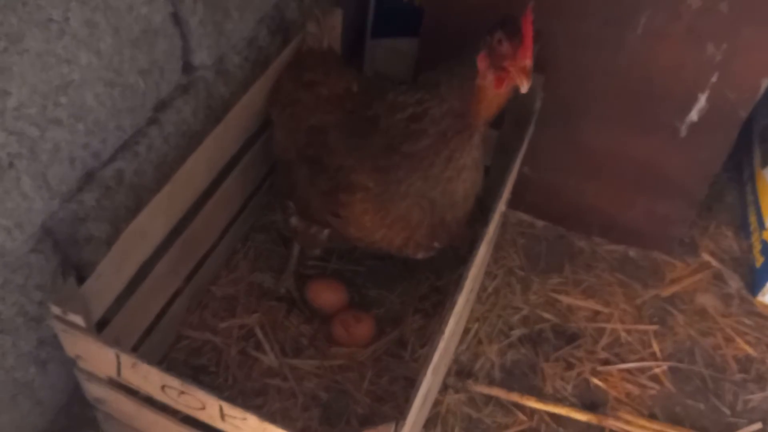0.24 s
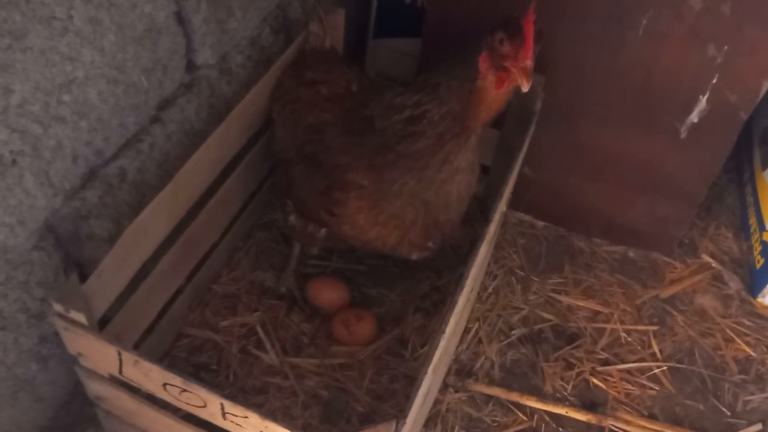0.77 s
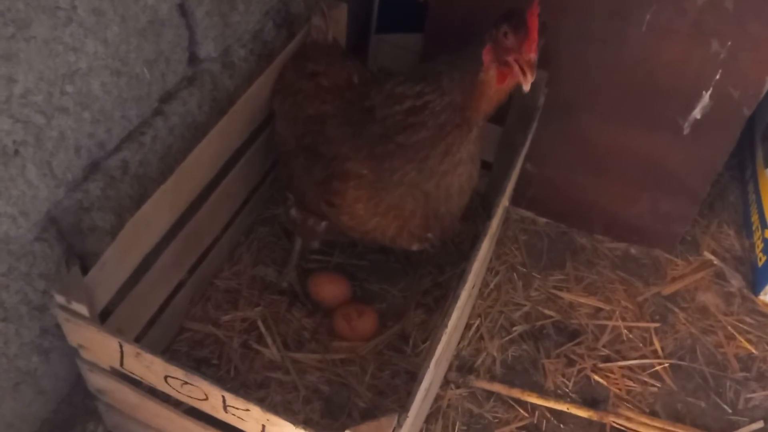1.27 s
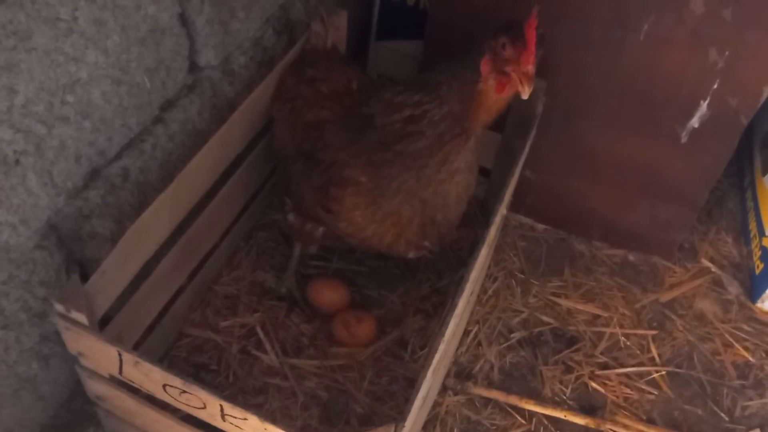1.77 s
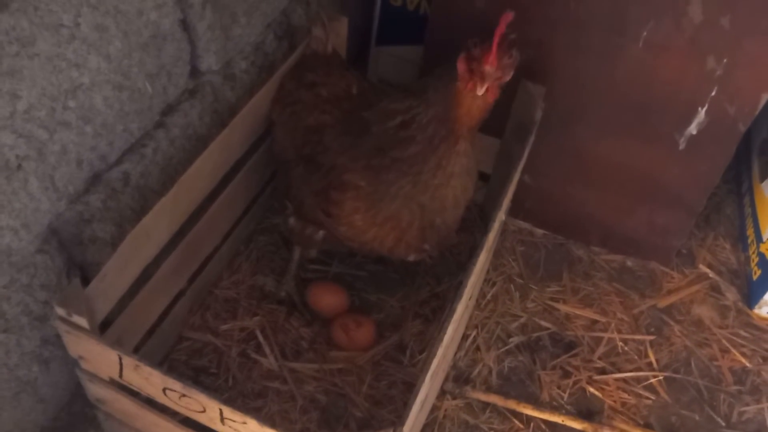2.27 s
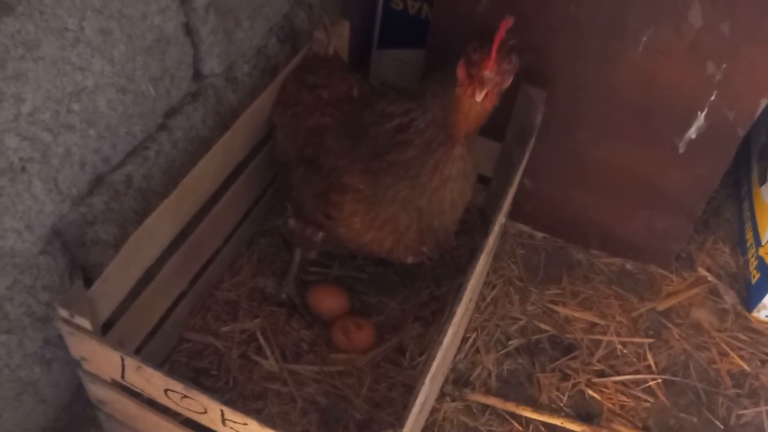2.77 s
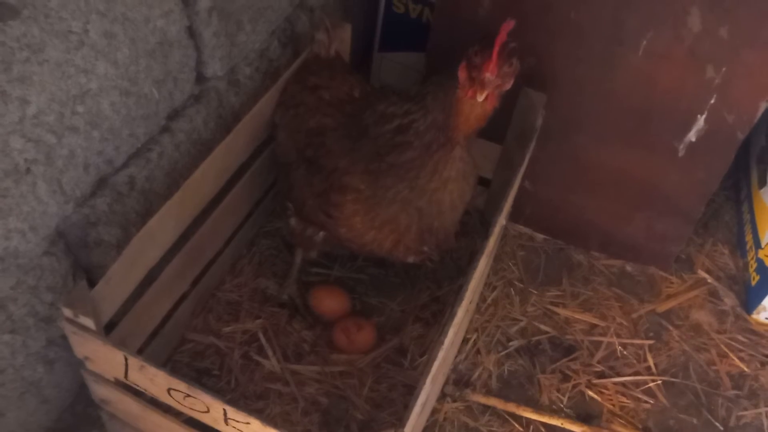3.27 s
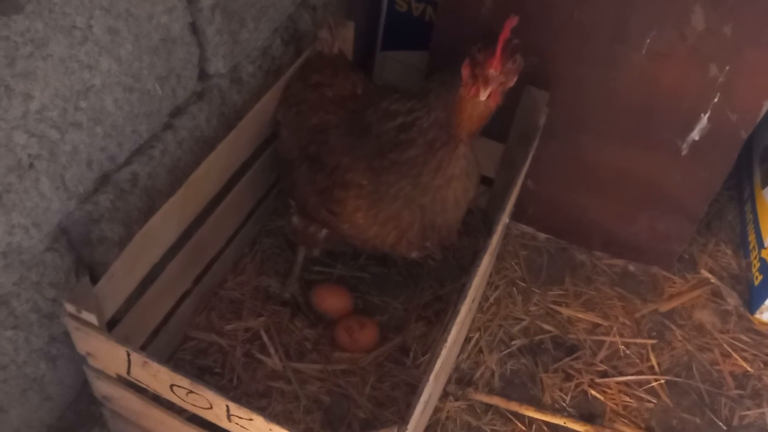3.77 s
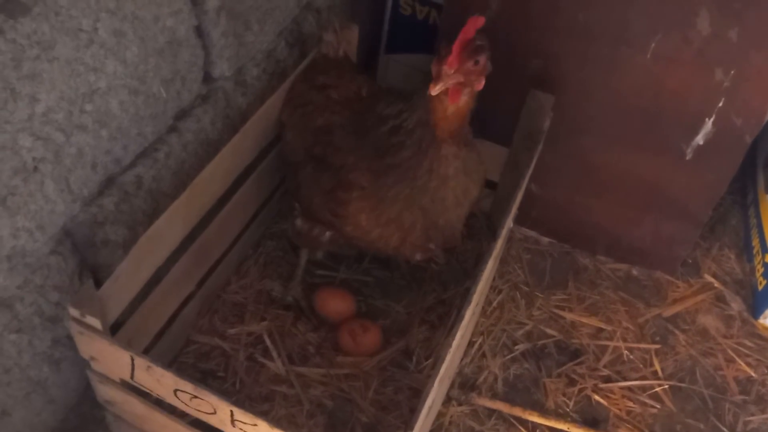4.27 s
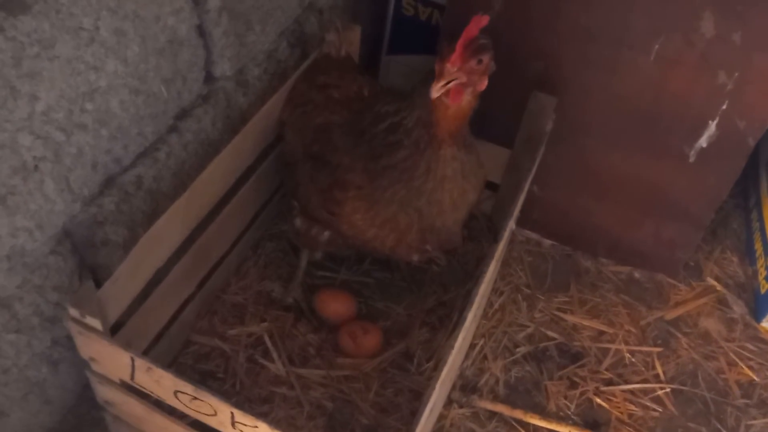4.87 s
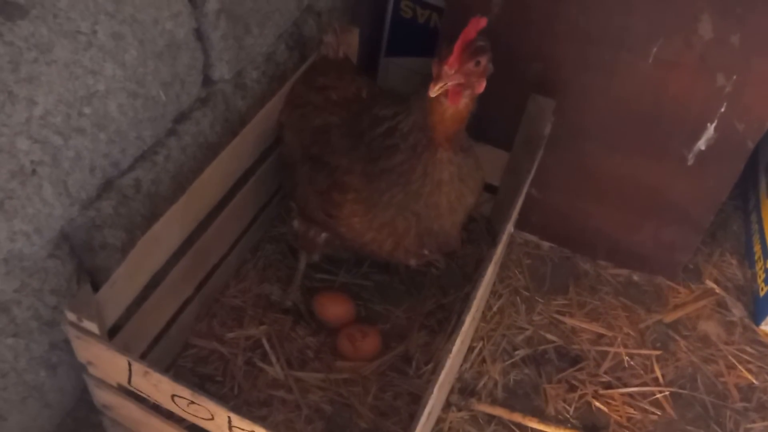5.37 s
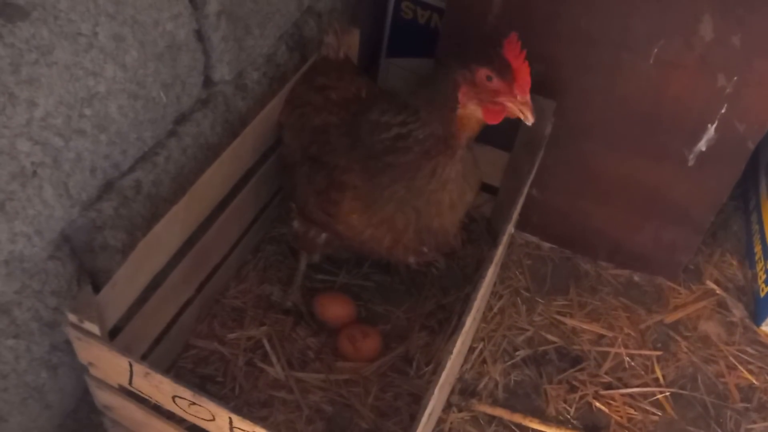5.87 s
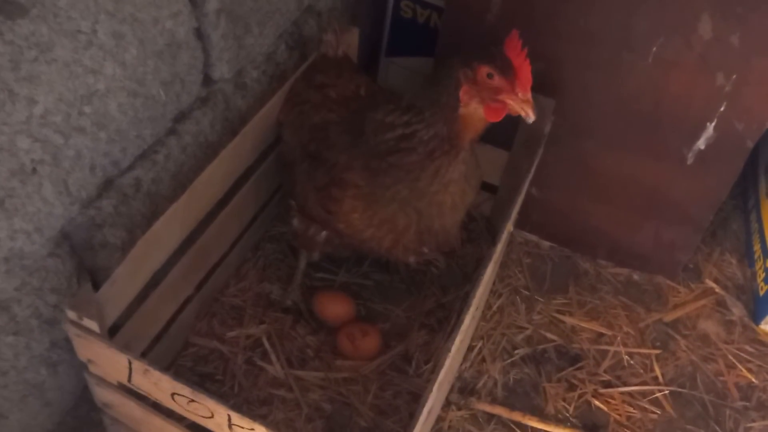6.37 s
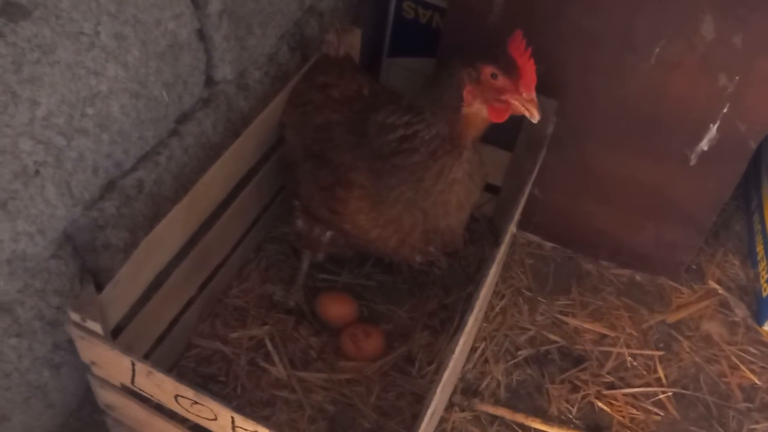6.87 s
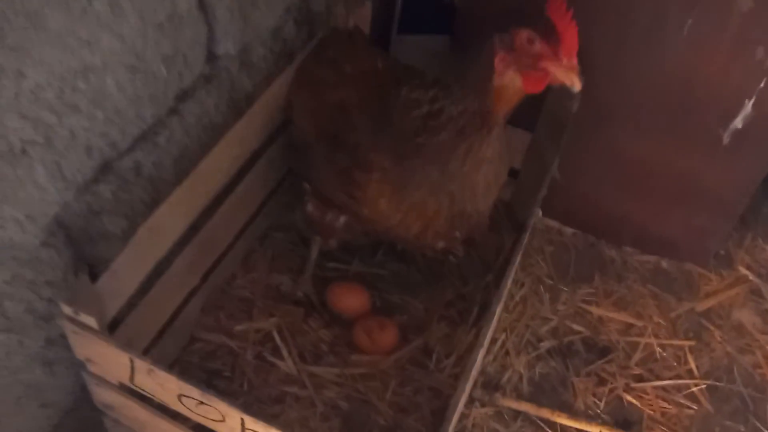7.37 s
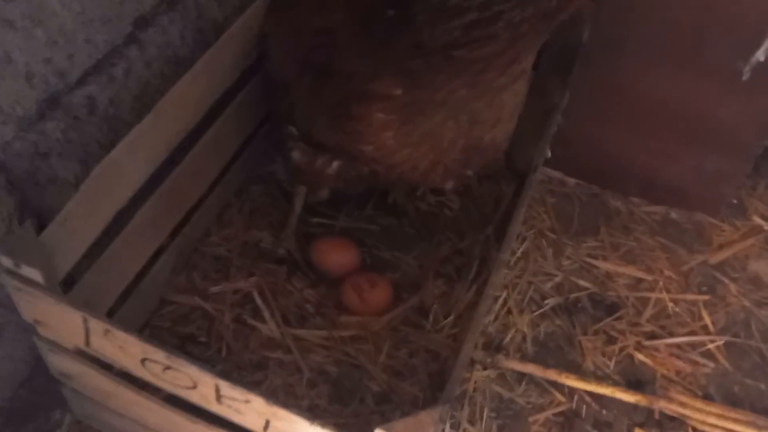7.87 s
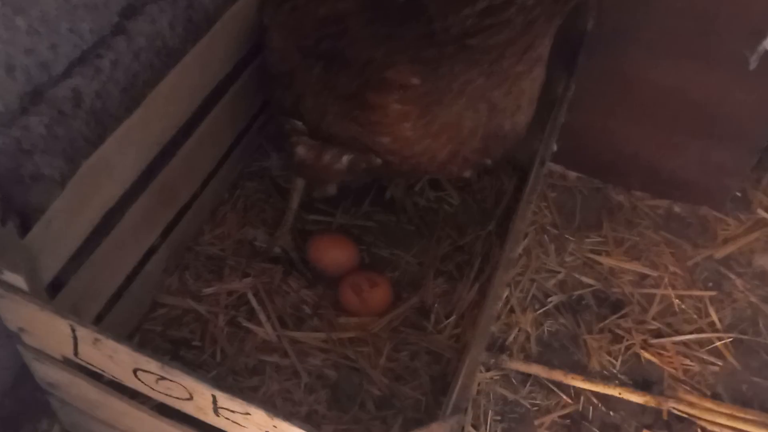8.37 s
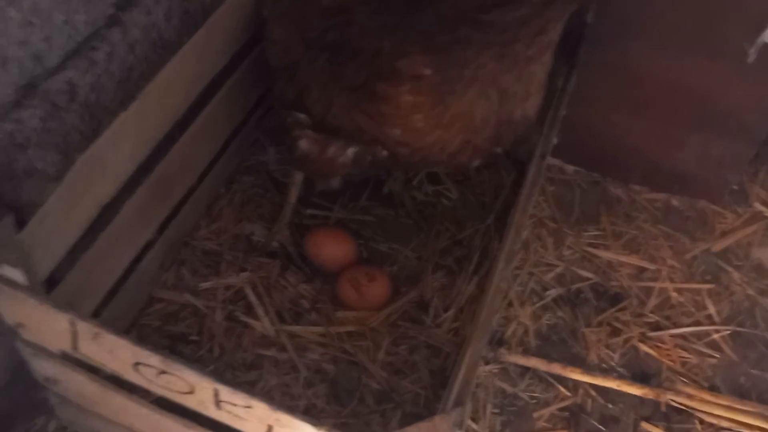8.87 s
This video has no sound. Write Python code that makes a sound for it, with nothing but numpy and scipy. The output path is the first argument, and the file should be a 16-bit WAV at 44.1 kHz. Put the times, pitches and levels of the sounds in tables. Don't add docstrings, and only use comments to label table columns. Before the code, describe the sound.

One hen cackles without pause close to a stereo microphone in a small shed. Hoarse, throaty clucks of about a tenth of a second come roughly three per second; every second or third stretches into a louder squawk that briefly locks into a clear rising tone, then breaks up. Short woody reflections from the nest box and a faint low hush surround her.

```python
import sys
import numpy as np
from scipy import signal
from scipy.fft import rfft, irfft, next_fast_len
from scipy.io import wavfile
from scipy.ndimage import uniform_filter1d, map_coordinates

SR = 44100
rng = np.random.default_rng(int(sys.argv[2]) if len(sys.argv) > 2 else 0)


def digitize_waveform(pressure):
    field = np.atleast_2d(pressure).T
    bounded = np.clip(field, -1, 1)
    quanta = np.round(bounded * 32767).astype(np.int16)
    wavfile.write(sys.argv[1], SR, quanta)


def convert_level_to_amplitude(level_db):
    exponent = np.asarray(level_db, float) / 20
    return 10 ** exponent


N = 402633

# start t/s, length t/s, peak level/dB, windpipe f/Hz (twice the slap rate)
CLUCK_EVENTS = [(0.064, 0.11, -20, 1085), (0.319, 0.093, -20.5, 1070), (0.657, .1, -18.5, 1100),
                (0.918, 0.1, -19.5, 1120), (1.161, 0.098, -19.5, 1050), (1.568, 0.098, -20, 1100),
                (1.812, .11, -21, 1060), (2.177, 0.088, -21.5, 1045), (2.426, .1, -20.5, 1060),
                (2.87, 0.087, -21.5, 1070), (3.123, .12, -22, 1045), (3.404, 0.071, -23, 1025),
                (3.77, 0.12, -19, 1060), (4.072, 0.087, -20, 1025), (4.465, 0.095, -21.5, 1045),
                (4.737, .1, -22, 1020), (5.125, .082, -21.5, 1035), (5.447, 0.097, -23, 1010),
                (5.693, .08, -23.5, 1020), (6.049, .09, -20, 1035), (6.473, 0.086, -23, 1055),
                (6.709, 0.11, -22.5, 1045), (7.053, .1, -20.5, 1050), (7.314, 0.074, -24.5, 1060),
                (7.665, 0.096, -23.5, 845), (7.902, .08, -23, 935), (8.246, 0.083, -23, 1000),
                (8.719, .09, -26.5, 925), (8.958, 0.088, -25.5, 950)]
POSTURE_TURNS = [
    2.39,
    7.55,
]
BEAK_HZ, RASP_HZ, TOP_HZ = 1400, 2950, 15900


def hen():
    # f/Hz, width f/Hz, level/dB
    resonances = [
        [(272, 150, -22), (477, 110, -20.5), (807, 140, -3.5), (1460, 130, -27.5), (1970, 270, -19.5),
         (2150, 820, -7.5), (3735.6, 180, -24.5), (4250, 240, -28.5), (5230, 990, -41), (8000, 2100, -35),
         (13470, 1800, -44.5)],
        [(254, 170, -23), (473, 97, -19), (790, 220, -9.5), (1700, 1200, -23.5), (2340.7, 450, -18),
         (3395, 260, -20.5), (4247, 270, -25.5), (5055, 860, -39.5), (5620, 200, -38.5), (8390, 2100, -36),
         (13100, 3200, -48)],
        [(253, 110, -21.5), (520, 350, -20), (1100, 1000, -6), (1513.5, 55, -15), (2070, 530, -4.5),
         (3670, 200, -22), (4040, 270, -27), (5600, 2000, -30.5), (8447, 2000, -44), (13000, 2400, -49)],
    ]
    (gains, slap_hz), where = drive(), posture()
    breath = np.array([[.2], [.3], [.55]])
    source = slaps(slap_hz, wander=.11, scatter_db=1.8, breath=breath)
    main = windpipe(source[0], slap_hz, width_hz=293)

    def above(f, edge):
        return 1 / (1 + (edge / (f + 1)) ** 12)

    def zones(f):
        beak, rasp = above(f, BEAK_HZ), above(f, RASP_HZ)
        return np.array([1 - beak, beak - rasp, rasp])

    voice, held = tone(gains[2])
    gains = gains * convert_level_to_amplitude(held * np.array([[-26], [-22], [-12.5]]))
    for p, modes in enumerate(resonances):
        at = np.flatnonzero(where == p)
        parts = filtered(source[:, at], lambda f: throat(modes)(f) * zones(f))
        parts[0] += main[at]
        voice[at] += sum(g * unit(part) for g, part in zip(gains[:, at], parts))
    return voice


def drive():
    # start t/s, peak t/s, release t/s, start level/dB, peak level/dB
    squawks = [(0.374, 0.473, .072, -25, -14.5), (1.241, 1.329, 0.066, -24.5, -17),
               (1.870, 1.966, .07, -25, -18.5), (2.488, 2.605, 0.063, -23, -15.5),
               (3.460, 3.58, 0.073, -23, -14.5), (4.138, 4.220, 0.081, -21.5, -17.5),
               (4.814, 4.922, 0.068, -24, -15.5), (5.763, 5.869, 0.072, -23.5, -16),
               (6.100, 6.175, .055, -25.5, -21), (6.785, 6.860, .06, -26, -19),
               (7.966, 8.066, 0.087, -23.5, -15), (8.300, 8.380, 0.068, -25, -19.5),
               (9.031, 9.140, .06, -27, -17)]
    # share of its length, effort level/dB, beak opening level/dB, rasp level/dB
    cluck_course = [
        (0, -10.5, -19, -29),
        (.17, -4.5, -16.5, -24),
        (.5, 0, -15, -20.5),
        (.7, -2.5, -19, -21),
        (1, -21, -17.5, -20.5),
    ]
    # share of the release, effort level/dB, beak opening level/dB, rasp level/dB
    release_course = [
        (0, -0.5, -6, -14),
        (.22, -3.5, -8, -15),
        (.6, -6.5, -15.5, -18.5),
        (0.999, -23.5, -18.5, -21),
    ]
    # beak level/dB, rasp level/dB
    posture_opening = [
        (-1, 0.6),
        (-0.33, -0.08),
        (1.5, -1.5),
    ]
    stretch_hz = [
        39.97,
        60.26,
        131.2,
    ]
    power, t, where = np.zeros((3, N)), np.arange(N) / SR, posture()

    share, effort_db, beak_db, rasp_db = np.transpose(cluck_course)
    pushes = [push(start + share * length, peak_db + effort_db, beak_db, rasp_db, fade_s=.015)
              for start, length, peak_db, _ in CLUCK_EVENTS]
    share, effort_db, beak_db, rasp_db = np.transpose(release_course)
    beak_db, rasp_db = np.r_[-14.5, beak_db], np.r_[-18.5, rasp_db]
    for start, peak, release, start_db, peak_db in squawks:
        times = np.r_[start, peak + share * release]
        pushes.append(push(times, np.r_[start_db, peak_db + effort_db], beak_db, rasp_db, fade_s=.025))
    for at, gains in pushes:
        power[:, round(at[0] * SR):][:, :len(at)] += gains ** 2
    power[1:] *= convert_level_to_amplitude(2 * np.array(posture_opening)[where].T)

    starts, windpipe_hz = np.transpose(CLUCK_EVENTS)[[0, 3]]
    call = np.clip(np.searchsorted(starts - .03, t) - 1, 0, None)
    stretch = sum(np.interp(t, [start, peak, peak + .1, peak + .12], [0, 1, 1, 0])
                  for start, peak, *_ in squawks)
    slap_hz = (windpipe_hz[call] + stretch * np.array(stretch_hz)[where]) / 2
    return np.sqrt(power), slap_hz


def push(s, effort_db, beak_db, rasp_db, fade_s):
    t = np.arange(round((s[0] - fade_s) * SR), min(round((s[-1] + .02) * SR), N)) / SR
    edge = np.clip(np.minimum((t - s[0]) / fade_s + 0.87, (s[-1] + 0.019 - t) / .02), 0, 1)
    zones = ((0, 1.1), (beak_db, 3), (rasp_db, 2.6))  # level/dB, lateness exponent
    return t, np.array([edge ** late * convert_level_to_amplitude(np.interp(t, s, effort_db + db)) for db, late in zones])


def slaps(hz, wander, scatter_db, breath):
    cycles = np.cumsum(hz * (1 + wander * wobble(260)) / SR)
    at = np.flatnonzero(np.diff(np.floor(cycles)))
    pulses = unit(np.bincount(at, convert_level_to_amplitude(scatter_db * rng.standard_normal(N)[at]), N))
    puff_envelope = signal.lfilter([1], [1, -np.exp(-1 / (.002 * SR))], pulses)
    puffs = puff_envelope * rng.standard_normal(N)
    throb = convert_level_to_amplitude(1.5 * wobble(150) + 1.3 * wobble(70))
    return throb * (np.sqrt(1 - breath) * pulses + np.sqrt(breath) * unit(puffs))


def windpipe(x, hz, width_hz):
    pipe_hz = np.arange(800, 1201, 100)[:, None]
    near = np.clip(1 - abs(np.clip(2 * hz, 800, 1200) - pipe_hz) / 100, 0, 1)
    rings = filtered(x, throat([(pipe_hz, width_hz, 0)], passes=3))
    return (near * rings).sum(0)


def throat(modes, passes=2):
    def mode(f, centre, width):
        loss = (f * width) ** 2
        return (loss / ((centre * centre - f * f) ** 2 + loss)) ** (passes / 2)

    return lambda f: sum(convert_level_to_amplitude(db) * mode(f, centre, width) for centre, width, db in modes)


def tone(rasp):
    # start t/s, end t/s, settled pitch f/Hz, level/dB, closing upturn f/Hz
    locked = [(0.378, 0.466, 528, -20, 12), (1.238, 1.321, 530.3, -24.5, 3.2),
              (1.878, 1.955, 534.3, -22, 1.99), (2.500, 2.599, 530, -23, 3.06),
              (3.472, 3.577, 542, -20.5, 22), (4.146, 4.212, 517.4, -19.5, 2.06),
              (4.840, 4.922, 534.3, -20, 45), (5.790, 5.862, 536.8, -18, 32),
              (6.108, 6.164, 512.4, -21.5, 2.3), (7.970, 8.046, 533, -23.5, 24.7),
              (8.306, 8.361, 520, -24.5, 2.13), (9.055, 9.126, 535.4, -26.5, 34)]
    # f/Hz, level/dB
    overtones = [(260, -45), (450, -10), (1080, 9.5), (1630, -12.5), (2190, -10), (2740, -37),
                 (3130, -21.5), (4340, -28), (6570, -35), (8450, -30.5), (10700, -40), (13000, -42),
                 (15500, -44.5)]
    beak_level_db = [-10, -9, 1.5]
    voice, held, k = np.zeros(N), np.zeros(N), np.arange(1, 30)[:, None]
    waver = wobble(350)
    tremble = 1 + 0.002 * wobble(200)
    zones = [k < 3, (k > 2) & (k < 6), k > 5]
    for start, end, hz, level_db, upturn_hz in locked:
        on = slice(round(start * SR), min(round(end * SR), N))
        sample = np.arange(on.start, on.stop)
        t = sample / SR
        upturn = upturn_hz * np.exp((t - end) / .012)
        settling = 1 - .095 * np.exp((start - t) / .03)
        f = k * (hz * settling + upturn) * tremble[on]
        swell_db = 1.5 * ((t - start) / (end - start) - .5) + 0.129 * upturn
        level = convert_level_to_amplitude(level_db + swell_db)
        scatter_db = rng.normal(0, 2.5, k.shape) * (k > 5)
        size = convert_level_to_amplitude(along(overtones, f) + scatter_db) * (f < TOP_HZ)
        beak_level = level * convert_level_to_amplitude(beak_level_db[np.searchsorted(POSTURE_TURNS, start)])
        gains = [level, beak_level, convert_level_to_amplitude(-0.8) * rasp[on]]
        phase = .8 * k ** 1.5 + (f / 9500) ** 2 * waver[sample - 900 * k]
        waves = np.sqrt(2) * size * np.cos(2 * np.pi * np.cumsum(f, axis=1) / SR + phase)
        voice[on] = sum(g * (waves * z).sum(0) / np.sqrt((size ** 2 * z).sum(0))
                        for g, z in zip(gains, zones))
        held[on] = np.clip(np.minimum((t - start) / .025, (end - t) / .006 + (on.stop == N)), 0, 1)
    return voice * np.sin(held * np.pi / 2), held


def ports(x):
    # f/Hz, width f/Hz, remaining level/dB
    pockets = [
        (3080, 600, -14),
        (2940, 700, -28),
        (3000, 320, -12),
    ]
    # f/Hz, level/dB
    louder = [
        [(60, 12), (180, -1), (550, -0.5), (1650, -2), (4970, -3.5), (15000, -18)],
        [(60, 1), (180, 4.5), (550, 0), (1650, -1.0), (4970, -3), (15000, -13)],
        [(60, 4.5), (180, 4.5), (550, -2), (1650, -1.5), (4970, -2.5), (15000, -21)],
    ]
    lags = [
        3,
        2,
        4,
    ]
    # t/s, level/dB
    facing = [(0, -0.5), (2.3, .5), (4.0, -0.5), (4.2, -0.9), (5.752, -1), (5.95, -0.3), (7.4, 0),
              (7.6, -1)]
    fidget = .55
    where, half, out = posture(), np.array([[.5], [-.5]]), np.zeros((2, N))
    boards = rng.standard_normal((len(pockets), 3, 60))
    for a, b in calls():
        p = where[a]
        c, w, db = pockets[p]
        twist, *comb = np.sqrt(1 - fidget ** 2) * boards[p] + fidget * rng.standard_normal((3, 60))

        def phase(f):
            scatter = .95 * map_coordinates(twist, [f / 500]) * np.clip(f / 750, .2, 1)
            return scatter - 2 * np.pi * f * lags[p] / SR

        def tint(f):
            ripple = np.array([map_coordinates(v, [f / 330]) for v in comb])
            return convert_level_to_amplitude(1.8 * ripple * np.clip(f / 2500 - 1, 0, 1))

        def pocket(f):
            detuning = c * c - f * f
            return (detuning + 1j * f * w * convert_level_to_amplitude(db)) / (detuning + 1j * f * w)

        def response(f):
            return pocket(f) * tint(f) * convert_level_to_amplitude(half * along(louder[p], f)) * np.exp(1j * half * phase(f))

        out[:, a:b] = filtered(x[a:b], response)
    return out * convert_level_to_amplitude(half * np.interp(np.arange(N) / SR, *np.transpose(facing)))


def echo(x, decay, gap_s):
    out = np.zeros((2, N + SR))
    for a, b in calls():
        hz, t, z = signal.stft(rng.standard_normal((2, SR // 4)), SR, nperseg=128)
        z[1] += .55 * z[0] * (hz[:, None] < 2500)
        left, right = np.mean(abs(z) ** 2, axis=2)
        z[0] *= np.sqrt(right / left)[:, None]
        tail = signal.istft(z * convert_level_to_amplitude(-60 * t / along(decay, hz)[:, None]), SR, nperseg=128)[1]
        wet = signal.fftconvolve(x[:, a:b], tail / np.linalg.norm(tail[0]), axes=1)
        out[:, a + round(gap_s * SR):][:, :wet.shape[1]] += wet
    return out[:, :N]


def hush(voice):
    # f/Hz, level/dB (per Hz)
    spectrum = [(15, -31.5), (25, -5.5), (110, -5.5), (215, -18.5), (919, -35.5), (3530, -39),
                (7700, -49.5), (9500, -43), (15500, -43)]
    power = abs(uniform_filter1d(voice ** 2, round(.05 * SR)))
    gate_db = 8.5 * power / (power + convert_level_to_amplitude(2 * -35))
    swell_db = 1.5 * wobble(3) + gate_db
    common, own = rng.standard_normal(N), rng.standard_normal((2, N))
    noise = filtered(common + .4 * own, lambda f: convert_level_to_amplitude(along(spectrum, f)))
    return convert_level_to_amplitude(-78 + swell_db) * unit(noise)


def posture():
    return np.searchsorted(np.array(POSTURE_TURNS) * SR, np.arange(N))


def calls():
    cuts = [round((start - .03) * SR) for start, *_ in CLUCK_EVENTS] + [N]
    return zip(cuts, cuts[1:])


def unit(x):
    return x / np.sqrt(np.mean(x ** 2) + 1e-20)


def along(points, hz):
    f, v = np.transpose(points)
    return np.interp(np.log(hz + 1), np.log(f + 1), v)


def filtered(x, response):
    m = next_fast_len(x.shape[-1] + 4096)
    return irfft(rfft(x, m) * response(np.fft.rfftfreq(m, 1 / SR)), m)[..., :x.shape[-1]]


def wobble(rate):
    return map_coordinates(rng.standard_normal(int(N * rate / SR) + 4), [np.arange(N) * rate / SR])


def scene():
    # f/Hz, 60 dB decay t/s
    crate_decay = [(200, 0.31), (1000, 0.14), (3500, 0.16), (6500, 0.075), (12000, 0.034)]
    # f/Hz, 60 dB decay t/s
    shed_decay = [(200, .45), (1000, .37), (3000, .3), (8000, .2)]
    voice = filtered(hen(), lambda f: 1 / (1 + (170 / (f + 1)) ** 5))
    bird = convert_level_to_amplitude(1.11) * ports(voice)
    crate = convert_level_to_amplitude(-9) * echo(bird, crate_decay, gap_s=.002)
    shed = convert_level_to_amplitude(-40) * echo(bird, shed_decay, gap_s=.012)
    return bird + crate + shed + hush(voice)


def top_cut(x):
    return signal.sosfilt(signal.butter(12, 15910, fs=SR, output="sos"), x)


def record(dry):
    x = dry / (1 + abs(dry / .95) ** 8) ** (1 / 8)
    x = dry + filtered(x - dry, lambda f: f > 200)
    x = filtered(x, lambda f: (f < TOP_HZ) / (1 + (42 / (f + 1)) ** 4))
    return top_cut(x)


dry = scene()
out = record(dry)
digitize_waveform(out)
```